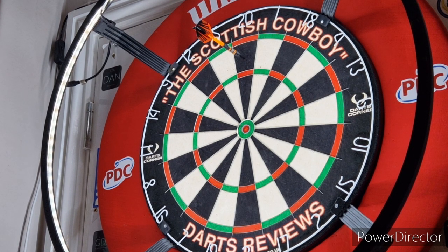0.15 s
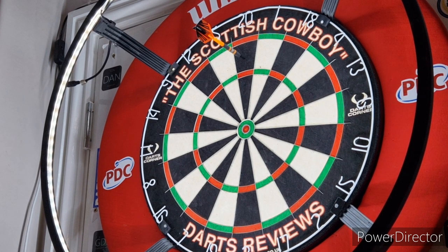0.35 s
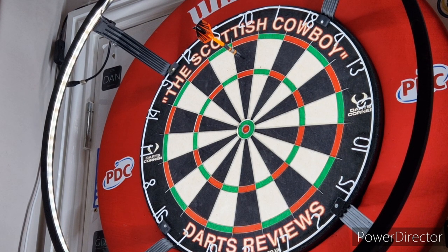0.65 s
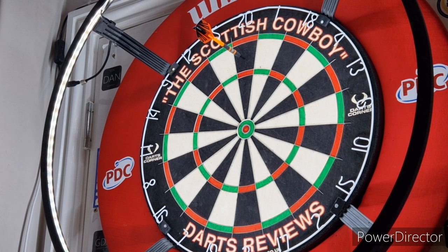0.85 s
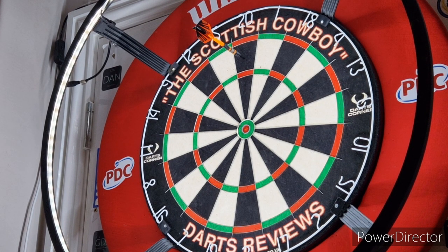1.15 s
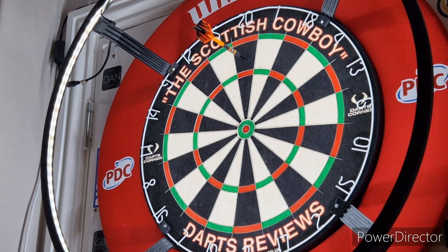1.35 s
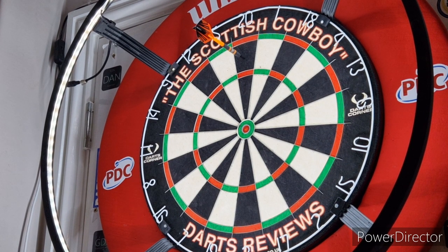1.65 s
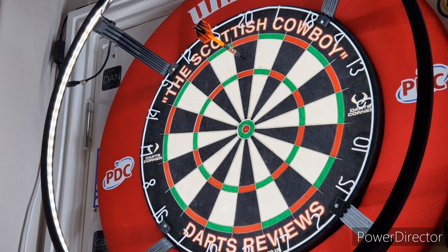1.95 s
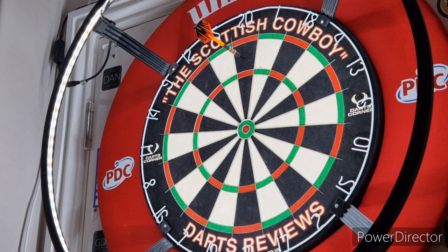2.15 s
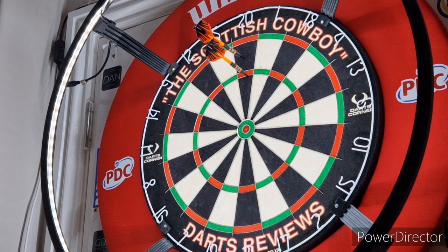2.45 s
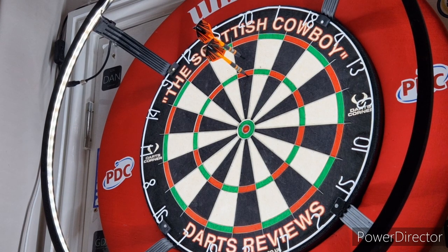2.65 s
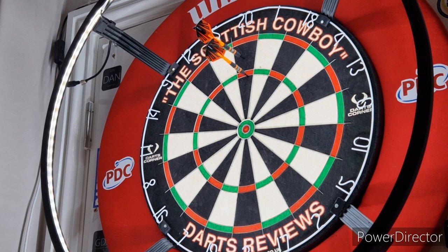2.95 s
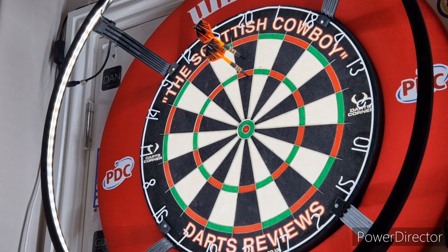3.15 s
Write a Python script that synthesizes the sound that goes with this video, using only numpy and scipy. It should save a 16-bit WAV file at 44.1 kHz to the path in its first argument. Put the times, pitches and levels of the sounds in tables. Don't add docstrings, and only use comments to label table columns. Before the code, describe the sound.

A dart thuds into a bristle board at about 2.6 s, close and loud: a sharp fibrous crunch, low wall thump and brief woody ring. Before it, a faint knock dies away, spare darts clink farther off at 0-0.1, 0.5, 1.2 s, and feet knock floorboards at 2.1 s. Footsteps follow at 2.9-3.1 s. Low appliance hum, faint hiss, short room reverberation.

```python
import sys
import numpy as np
from scipy import signal
from scipy.fft import rfft, irfft
from scipy.io import wavfile

SR = 44100
rng = np.random.default_rng(int(sys.argv[2]) if len(sys.argv) > 2 else 0)


def voltage_ratio(decibels):
    exponent = np.asarray(decibels, float) / 20
    return 10 ** exponent


def master(y):
    cut = np.clip(np.atleast_2d(y).T, -1, 1)
    pcm = np.round(cut * 32767)
    wavfile.write(sys.argv[1], SR, pcm.astype(np.int16))


N = 145530
T = np.arange(N) / SR


def unit(x):
    return x / np.sqrt(np.mean(x ** 2))


def band(x, hz, width):
    return signal.lfilter(*signal.iirpeak(hz, hz / width, SR), x)


def colour(x, table):
    f = np.fft.rfftfreq(x.shape[-1], 1 / SR) + 1
    hz, db = np.transpose(table)
    gain = voltage_ratio(np.interp(np.log(f), np.log(hz), db))
    return irfft(rfft(x) * gain, x.shape[-1])


def fade(t, t60, rise):
    t = np.maximum(t, 0)
    onset = 1 - np.exp(-(t / max(rise, 1e-4)) ** 2)
    return onset * np.exp(-np.log(1000) * t / t60)


def pair(size):
    mid, side = rng.standard_normal((2, size))
    part_ways_hz = 540
    side = signal.lfilter(*signal.butter(2, part_ways_hz, "high", fs=SR), side)
    return mid + side * np.array([[1], [-1]])


def pan(x, db):
    return x * voltage_ratio(np.array([[db / 2], [-db / 2]]))


def ring(t, modes, rise, lag=0., scatter=0.):
    out = np.zeros(N)
    live = (t > 0) & (t < 1)
    t = t[live]
    for hz, db, t60 in modes:
        late = t - lag * np.sqrt(400 / hz)
        level_chance, pitch_chance = scatter * rng.standard_normal(2)
        tone = np.sin(2 * np.pi * hz * (1 + 0.098 * pitch_chance) * late)
        out[live] += voltage_ratio(db + 6.7 * level_chance) * fade(late, t60, rise) * tone
    return out


def thump(t, table, cycles, rise, lag):
    table_hz, table_db = np.transpose(table)
    hz = np.geomspace(table_hz[0], 2800, 20)
    db = np.interp(np.log(hz), np.log(table_hz), table_db)
    return ring(t, zip(hz, db, cycles / hz + .006), rise, lag, .3)


# pitch_hz, t60_s
ROOM_DECAY = [(125, 0.79), (250, 0.21), (500, 0.52), (1000, 0.37), (2000, .3), (4000, 0.25), (8000, 0.34),
              (14000, 0.094)]


def room(x):
    t, noise, tail = T[:SR // 2], pair(SR // 2), 0
    for hz, t60 in ROOM_DECAY:
        part = band(noise, hz, hz * 1.37) * fade(t, t60, 0.0059)
        tail = tail + part * np.sqrt(hz / np.sum(part ** 2, axis=1, keepdims=True))
    tail = tail / np.sqrt(np.sum(tail ** 2) / 2)
    return signal.fftconvolve(x, tail, axes=1)[:, :N]


# pitch_hz, level_db (per Hz)
AIR_SPECTRUM = [(60, 3), (110, 2), (220, -12), (300, -15.5), (600, -23.5), (2500, -33.5), (9000, -43.5),
                (16000, -49)]


def air():
    return unit(colour(pair(N), AIR_SPECTRUM)) * voltage_ratio(-65.5)


# pitch_hz, width_hz, level_db, steady share (ratio of pure tone to wavering noise)
HUM_TONES = [(52.86, 0.83, -48.5, 6.2), (62, 4.7, -67, 0.067), (161, 6.8, -73, 0.75),
             (210, 2.7, -76.5, 1.4)]


def appliance_hum():
    hum = 0
    for hz, width, db, steady in HUM_TONES:
        wavering = unit(band(rng.standard_normal(N), hz, width))
        hum = hum + voltage_ratio(db) * unit(wavering + steady * np.sin(2 * np.pi * hz * T))
    return hum * (1 - 0.32 * np.exp(-T / 0.018))


def dying_knock():
    return unit(colour(pair(N), HEEL_SPECTRUM)) * voltage_ratio(-63) * fade(T, 0.96, .0001)


def sleeve_swish():
    start_s, length_s = 2.35, 0.044
    cloth = unit(band(band(pair(N), 1300, 4400), 2000, 14000))
    return cloth * voltage_ratio(-75) * np.exp(-((T - start_s) / length_s) ** 2)


# start_s, level_db, pitch_hz, length_s
SQUEAK_EVENTS = [(1.222, -71, 1630, .03), (1.72, -80, 2450, .045), (.02, -78, 2700, .06),
                 (.04, -79, 3300, .05), (.058, -76, 7300, .04), (1.225, -71, 4100, .04),
                 (1.84, -89, 7500, .05), (.478, -72, 1920, .03), (2.9, -88, 3700, .04),
                 (2.9, -88, 2450, .06), (3.02, -86, 2450, .04), (3.1, -87, 3050, .08),
                 (3.19, -89, 4100, .04), (3.03, -80, 800, .04), (3.19, -88, 2500, .06)]


def squeaks():
    out = np.zeros((2, N))
    for start, db, hz, length in SQUEAK_EVENTS:
        gate = fade(T - start, 1.5, 0.001) * np.clip((start + length - T) / 0.025, 0, 1)
        width = 0.16 * hz
        out += unit(band(band(rng.standard_normal(N), hz, width), hz, width)) * gate * voltage_ratio(db)
    return out + voltage_ratio(5) * room(out)


# pitch_hz, level_db
HEEL_SPECTRUM = [(120, -6.5), (250, 1), (550, 3), (850, -1), (1200, -13), (2000, -31), (3000, -45),
                 (5000, -82)]
# pitch_hz, level_db, t60_s
FLOOR_MODES = [(58.1, -13.5, 0.45), (87.4, -12.5, 0.11), (145.7, -13, .06), (234, -4.5, 0.043)]
# start_s, level_db, boom_db, brightness_db (per octave about 500 Hz)
STEP_EVENTS = [
    (2.098, -26.5, 1, 3),
    (2.133, -29.5, -3, 1),
    (2.157, -44.5, 4, -1),
    (2.195, -44.5, -22, -5),
    (2.86, -28, -8, -0.5),
    (2.898, -31.5, 0, -3),
    (2.929, -41, 13.5, -3.5),
    (3.071, -28, 2.5, 1.5),
    (3.294, -58.5, 9, 12.5),
]


def footsteps():
    knocks = np.zeros((2, N))
    floor_lead_s = 0.00483
    for start, db, boom_db, bright_db in STEP_EVENTS:
        t = T - start
        heel = [(f, d + bright_db * np.log2(f / 500)) for f, d in HEEL_SPECTRUM]
        airborne = thump(t, heel, 6.34, 0.0019, .003)
        through_floor = voltage_ratio(-11.5) * thump(t + floor_lead_s, heel, 7.4, 0.0029, .001)
        boom = voltage_ratio(boom_db - 3) * ring(t, FLOOR_MODES, 0.0026, .001, 0.68)
        knocks += (airborne + through_floor + boom) * voltage_ratio(db - 3.5)
    return knocks + voltage_ratio(2) * room(knocks)


# pitch_hz, width_hz, level_db
DART_MODES = [(1824, 380, 3), (1725, 330, -3.5), (3050, 1900, -7.5), (3890, 1140, -10.5), (4747, 580, 1),
              (7170, 1300, -8), (9250, 1500, -2), (10700, 1400, -10), (13800, 5000, -2.5)]
# start_s, level_db (peak), contact_s, barrel_db, shaft_db
CLINK_EVENTS = [
    (0.017, -59.5, 0.0013, -6, -1),
    (0.056, -53, 0.0026, 10, 11),
    (0.085, -59, 0.018, -1, -3),
    (.098, -44, 0.0071, -11, -2),
    (0.475, -49.5, 0.0033, -0.5, -3.5),
    (0.622, -62, 0.0016, 1, 0),
    (1.219, -47, 0.0071, -0.5, 0),
    (1.785, -70, 0.017, -6, -6),
    (1.841, -75, 0.0097, -11, -4),
]


def dart_clinks():
    out, t = np.zeros((2, N)), T[:SR // 4]
    for start, db, contact, barrel_db, shaft_db in CLINK_EVENTS:
        i = int(start * SR)
        part_db = [barrel_db] * 2 + [shaft_db] * 3 + [0] * 4
        clink = 0
        for (hz, width, mode_db), extra_db in zip(DART_MODES, part_db):
            grit = rng.standard_normal(len(t)) * fade(t, 0.0077 + 4 * contact, contact)
            clink = clink + voltage_ratio(mode_db + extra_db) * band(band(grit, hz, width), hz, width) / np.sqrt(width)
        out[:, i:i + len(t)] += pan(clink / np.abs(clink).max() * voltage_ratio(db), 2)
    return voltage_ratio(-4.5) * out + voltage_ratio(0.5) * room(out)


# pitch_hz, level_db
CRACK_SPECTRUM = [(300, -8.5), (700, 2), (1300, 8.5), (2200, -11.5), (3200, -21), (4200, -21.5),
                  (10500, -42), (15000, -25)]
# pitch_hz, level_db
FLEX_SPECTRUM = [(250, -24), (420, -0.5), (600, -0.5), (1000, 2.5), (1400, 1.5), (2000, -7.5), (2600, -33)]
# pitch_hz, level_db, t60_s
BOARD_MODES = [(383, -1, 0.33), (423.8, 6, 0.16), (562.5, -2.5, 0.14), (597, 8.5, 0.12), (661, -3, 0.19),
               (788, -6.5, 0.26), (957, -6, 0.14), (1028, -5, 0.23), (1260, -6, 0.21), (1299, -16.5, .4),
               (1362, -14.5, 0.19), (1532, -22, .2), (1605, -13.5, 0.13), (1745, -28, 0.54)]
# pitch_hz, level_db, t60_s
WALL_MODES = [(61, 11.5, 0.15), (49.7, -10, 0.92), (77, -8.5, 0.59), (111.5, -15, .25), (146.7, -1, 0.12),
              (162.5, -15, 0.34), (204.6, -24.5, 0.22), (325, -27.5, .3)]


def dart_hit():
    t = T - 2.578
    sink_s = 0.0043
    crunch = unit(colour(rng.standard_normal(N), CRACK_SPECTRUM)) * fade(t, .03, sink_s) * voltage_ratio(-8.5)
    tick = unit(band(pair(N), 5300, 8820)) * fade(t, 0.017, 0.00065) * voltage_ratio(-37)
    sharp = crunch + tick
    flex = thump(t, FLEX_SPECTRUM, 13.7, 0.0033, 0.003244) * voltage_ratio(-13.5)
    board = ring(t, BOARD_MODES, sink_s, 0.002984) * voltage_ratio(-24.5) + flex
    wall = ring(t, WALL_MODES, .010, .0019) * voltage_ratio(-13.5)
    reflected = room(voltage_ratio(-5) * wall + voltage_ratio(-7.5) * board + voltage_ratio(-0.5) * sharp)
    return board + wall + pan(sharp, -1.5) + reflected


def scene():
    background = air() + appliance_hum() + dying_knock() + sleeve_swish()
    return background + squeaks() + footsteps() + dart_clinks() + dart_hit()


# pitch_hz, width_hz, level_db
PORT_RESONANCES = [(2385, 1500, 4.5), (5330, 1300, 6), (7620, 900, 8)]


def microphone_ports(x):
    return x + sum((voltage_ratio(db) - 1) * band(x, hz, width) for hz, width, db in PORT_RESONANCES)


# pitch_hz, level_db
SIDE_GAIN = [(200, 10.5), (700, -1.5), (2000, 1.5), (5000, 0.5), (9000, 1.5), (14000, 1)]


def port_spacing(x):
    lag_s, lag_below_hz = .00042, 300
    bass = signal.filtfilt(*signal.butter(1, lag_below_hz, fs=SR), x.mean(axis=0))
    slope = np.gradient(bass) * SR
    side = (x[0] - x[1]) / 2
    return x + (colour(side, SIDE_GAIN) - side + slope * lag_s / 2) * np.array([[1], [-1]])


def top_cut(x):
    return signal.sosfilt(signal.butter(12, 16670, fs=SR, output="sos"), x)


def record(dry):
    x = microphone_ports(dry)
    x = signal.sosfilt(signal.butter(4, 42, "high", fs=SR, output="sos"), x)
    x = port_spacing(x)
    x = signal.sosfilt(signal.ellip(8, .2, 60, 15600, fs=SR, output="sos"), x)
    return top_cut(x)


dry = scene()
out = record(dry)
master(out)
```